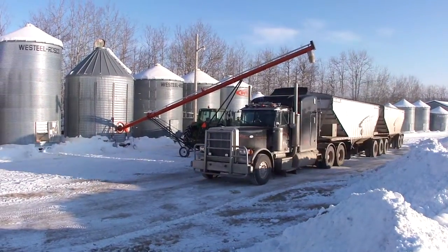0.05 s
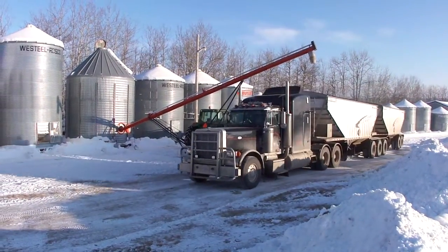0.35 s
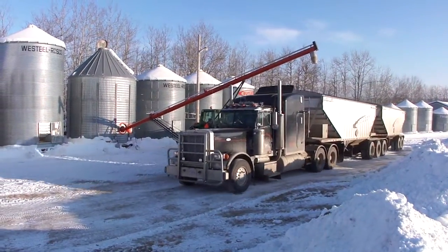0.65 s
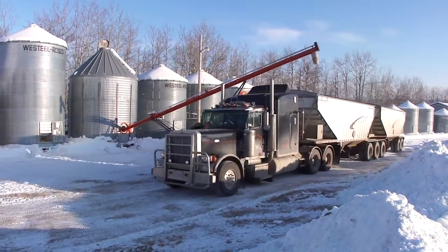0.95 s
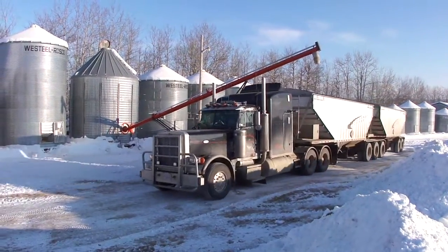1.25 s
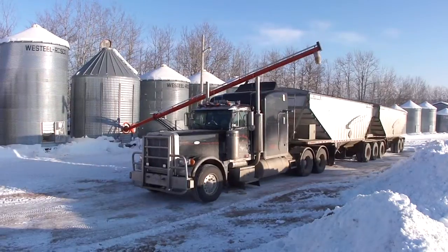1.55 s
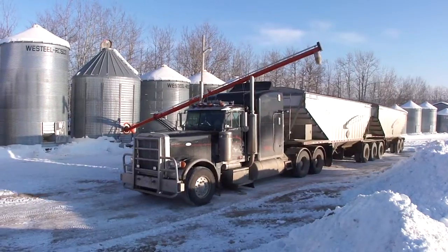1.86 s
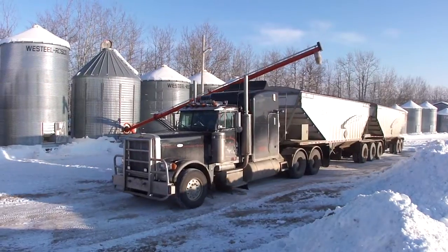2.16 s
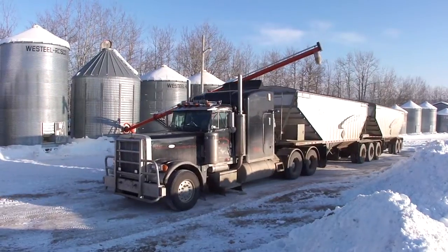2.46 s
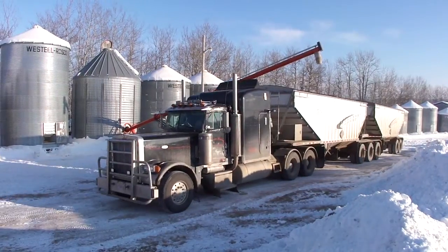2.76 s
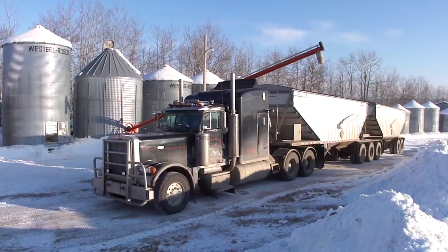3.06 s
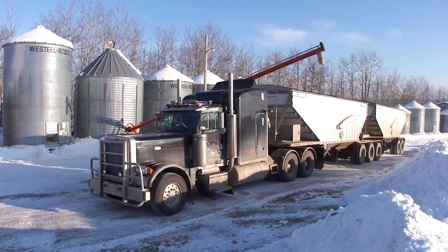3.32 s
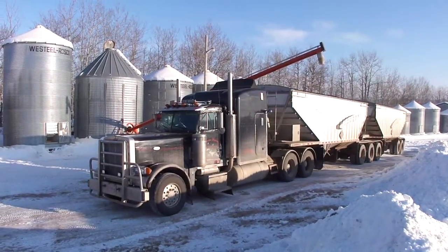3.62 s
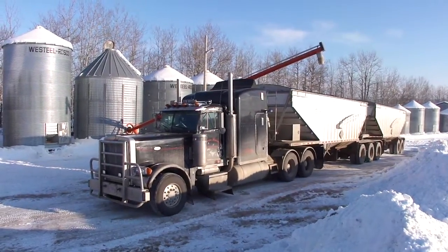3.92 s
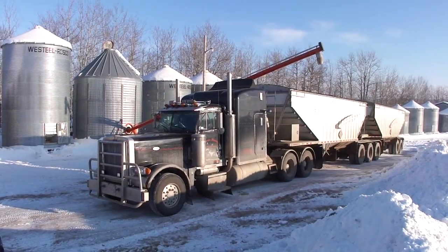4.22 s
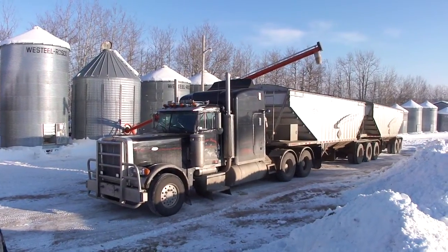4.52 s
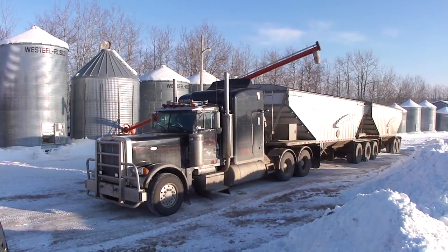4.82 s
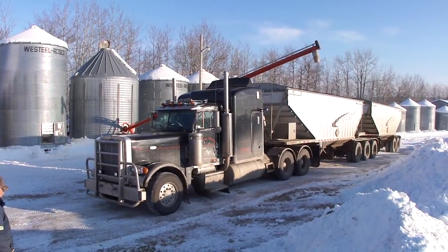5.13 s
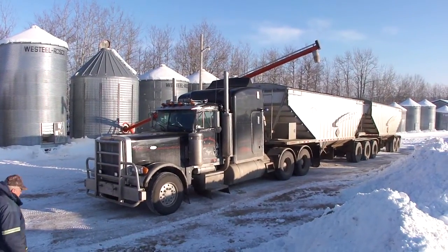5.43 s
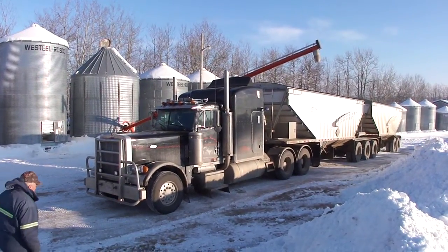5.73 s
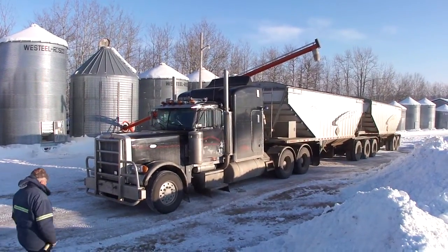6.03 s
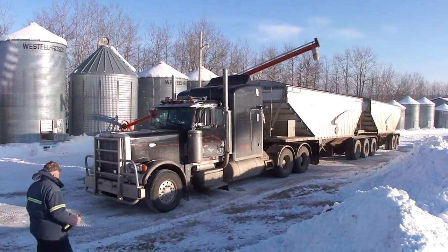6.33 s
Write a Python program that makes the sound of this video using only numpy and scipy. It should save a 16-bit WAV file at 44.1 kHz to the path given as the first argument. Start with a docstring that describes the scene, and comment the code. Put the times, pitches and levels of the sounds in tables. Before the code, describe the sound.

A heavy truck's diesel engine knocks and drones outdoors, with a few clicks, until a loud blast of air brake hiss bursts out and fades.

```python
"""A semi truck's air brakes let out a loud, fading hiss as compressed air rushes through their valves.
Before that, the truck rolls to a stop on a snowy farmyard, its tyres crunching on packed snow.
Its six-cylinder diesel idles throughout, knocking and droning as the cylinders fire in turn.
Steel grain bins echo a little, and automatic gain control turns everything down under the blast."""
import sys
import numpy as np
from scipy import signal
from scipy.fft import rfft, irfft, next_fast_len
from scipy.io import wavfile
from scipy.ndimage import uniform_filter1d, minimum_filter1d

SR = 44100
rng = np.random.default_rng(int(sys.argv[2]) if len(sys.argv) > 2 else 0)


def master_out(mix):
    """Clip the mix to full scale and print it as 16-bit PCM to the path in sys.argv[1]."""
    frames = np.transpose(np.atleast_2d(mix))
    ceiling = np.clip(frames, -1, 1)
    pcm = np.round(ceiling * 32767).astype(np.int16)
    wavfile.write(sys.argv[1], SR, pcm)


N = 281358
PADDED = next_fast_len(N + SR // 8, real=True)
T, HZ = np.arange(N) / SR, np.fft.rfftfreq(PADDED, 1 / SR)
TREBLE_LEFT_DB = 6.2  # hissy sounds are this much louder on the left


def gain_of(db):
    """Decibels to amplitude."""
    return 10 ** (np.asarray(db) / 20)

def evened(x):
    """Scales a sound to an average (rms) level of 1."""
    return x / np.sqrt(np.mean(x ** 2) + 1e-20)

def curve(points):
    """Joins (Hz, value) points into a value for every frequency."""
    hz, value = np.transpose(points)
    return np.interp(np.log(HZ + 1), np.log(hz + 1), value)

def filtered(x, gain):
    """Applies a gain for each frequency."""
    return irfft(rfft(x, PADDED) * gain, PADDED)[..., :N]

def coloured(x, spectrum, modes=()):
    """Gives a sound a broad tone colour and ringing peaks, at level 1."""
    lift_db = sum(db / (1 + (2 * (HZ - hz) / width) ** 2) for hz, width, db in modes)
    return evened(filtered(x, gain_of(curve(spectrum) + lift_db)))

def band(x, hz, width):
    """Keeps the part of a short sound near one frequency, at level 1."""
    f = np.fft.rfftfreq(x.shape[-1], 1 / SR) + 1
    return evened(irfft(rfft(x) / (1 + ((f - hz ** 2 / f) / width) ** 2), x.shape[-1]))

def wander(hz):
    """A random drift of size 1, up to the given rate."""
    return evened(np.interp(2 * hz * T, np.arange(4096), rng.standard_normal(4096)))

def tone(turns, db):
    """A pure tone with one wave per turn."""
    return gain_of(db) * np.sqrt(2) * np.sin(2 * np.pi * (turns + rng.random()))

def leftward(db):
    """Two channel gains that make the left louder by db."""
    return gain_of(np.array([[db], [-db]]) / 2)

def add(mix, start, sound):
    """Mixes a sound in at a start time in seconds."""
    part = mix[:, round(start * SR):][:, :sound.shape[-1]]
    part += sound[..., :part.shape[-1]]

# How alike left and right are. Each row: frequency in Hz, likeness from 0 to 1.
STEREO_LIKENESS = [(30, .6), (70, .85), (200, .98), (1200, .995), (2500, .985), (5500, .87), (11000, .83)]
def air():
    """Stereo white noise, most alike on both sides in the middle frequencies."""
    same = curve(STEREO_LIKENESS)
    mid, side = filtered(rng.standard_normal((2, N)), np.sqrt([(1 + same) / 2, (1 - same) / 2]))
    return np.array([mid + side, mid - side])

def road_speed(halt_s=3.2):
    """Share of the starting speed: the braking grows firmer until the halt."""
    return np.maximum(1 - (T / halt_s) ** 2, 0)

def nearness_db(start_m_per_s=2.85, parked_m=13.4):
    """The truck gets louder as it nears, reaching 0 dB where it stops."""
    rolled_m = np.cumsum(start_m_per_s * road_speed()) / SR
    return 20 * np.log10(parked_m / (parked_m + rolled_m[-1] - rolled_m))

def yard_echoes(x, fade_s=0.45, per_s=2000):
    """Sound bounces off the trailer and grain bins, differently on each side."""
    t = T[:SR // 2]
    echoes = rng.standard_normal((2, len(t))) * (rng.random((2, len(t))) < per_s / SR)
    echoes *= (t > .004) * gain_of(-60 * t / fade_s)
    echoes /= np.linalg.norm(echoes, axis=1, keepdims=True)
    return signal.fftconvolve(x, echoes, axes=1)[:, :N]

# Small clicks. Each row: start in seconds, level in dB, centre in Hz, width in Hz,
# seconds to fade by 60 dB.
CLICK_EVENTS = [(0.6166, -6, 1700, 1400, 0.012), (0.6164, -17, 3700, 3400, 0.015),
                (.6385, -31, 6500, 2500, .02), (.6555, -33, 6200, 5500, 0.023),
                (.7403, -27, 7300, 3500, 0.016), (.8311, -34, 5000, 3500, .03),
                (1.852, -32, 4700, 1500, 0.054), (1.881, -31, 7200, 2550, .025),
                (1.903, -32, 7000, 2500, .025), (1.976, -29, 7000, 3500, .02),
                (2.035, -33, 7000, 3500, .02), (2.544, -35, 7000, 3500, .025),
                (4.384, -25, 8600, 5000, 0.065), (5.572, -23, 6900, 1800, 0.036)]
def clicks(rise_s=.0008):
    """Valves, chassis and ice give sharp ticks that die at once."""
    out, t = np.zeros((2, N)), T[:SR // 2]
    for start, db, hz, width, fade_s in CLICK_EVENTS:
        snap = np.minimum(t / rise_s, 1) * gain_of(db - 60 * t / fade_s)
        add(out, start, snap * band(rng.standard_normal(len(t)), hz, width))
    return out * leftward(TREBLE_LEFT_DB)

# Spits of air. Each row: start and length in seconds, level in dB, centre and width in Hz, sputter in dB.
AIR_SPITS = [(0.634, 0.11, -36.5, 7300, 4500, 1), (0.657, 0.13, -33.5, 2700, 700, 5),
             (0.766, 0.14, -39, 6560, 3500, 3.5), (1.309, 0.045, -32, 5730, 700, 1),
             (1.316, 0.12, -33.5, 9300, 2500, -1), (4.388, .09, -43, 8000, 4000, 0)]
def spits(rise_s=0.0041, sputter_hz=164):
    """Small escapes of air swell quickly, sputter and fade."""
    out, noise, t = np.zeros((2, N)), air(), T[:SR // 2]
    for start, length, db, hz, width, sputter_db in AIR_SPITS:
        swell = (1 - np.exp(-t / rise_s)) * np.exp(-(t / length) ** 2)
        sputter = evened(gain_of(sputter_db * wander(sputter_hz)[:len(t)]))
        hiss = band(noise[:, round(start * SR):][:, :len(t)], hz, width)
        add(out, start, gain_of(db) * swell * sputter * hiss)
    return out * leftward(TREBLE_LEFT_DB)

# The tone colour of packed snow. Each row: frequency in Hz, relative level in dB.
SNOW_COLOUR = [(1000, -20), (2600, 12.5), (4500, 0.5), (6400, 4), (8000, 5), (10000, 1), (11500, -7)]
def tyres(cracks_per_s=900, hiss=0.17):
    """Snow cracks and hisses under the tyres, more quietly as they slow."""
    cracks = (rng.random(N) < cracks_per_s / SR) * gain_of(2 * np.minimum(rng.exponential(1, N), 4))
    crunch = coloured((cracks + hiss) * air(), SNOW_COLOUR)
    return gain_of(-39.5) * road_speed() ** 0.36 * crunch * leftward(TREBLE_LEFT_DB)

# The tone colour under the truck. Each row: frequency in Hz, relative level in dB.
UNDERSIDE_COLOUR = [(30, -85), (100, -46), (400, -17), (580, -1.5), (900, 4), (1200, -3), (1600, -10.5),
                    (3000, -32)]
def driveline(turns, teeth=48, clutch_s=1.23, fade_db_per_s=75):
    """Shafts rumble and gears whine until the clutch opens."""
    fade_db = fade_db_per_s * np.maximum(T - clutch_s, 0)
    rumble = gain_of(-40 - fade_db) * coloured(air(), UNDERSIDE_COLOUR)
    whine = tone(teeth * turns, -32 - fade_db + .3 * wander(hz=2.9))
    return (rumble + whine) * leftward(db=1)

def burst(start, rise, hold, sag_db_per_s, fade_db_per_s):
    """A loudness shape that rises, sags while it holds, then fades faster."""
    age = T - start
    fall_db = sag_db_per_s * np.maximum(age - rise, 0) + fade_db_per_s * np.maximum(age - rise - hold, 0)
    return np.clip(age / rise, 0, 1) * gain_of(-fall_db)

# Roars and clunks. Each row: start, rise and hold in seconds, level in dB, extra fade in dB a second.
ROARS_AND_CLUNKS = [(0.418, 0.26, 0.21, -24.5, 38), (1.125, 0.025, 0.023, -30, 200),
                    (4.489, 0.064, 0.015, -15, 400), (4.653, 0.025, 0.1, -24.5, 40),
                    (4.84, 0.022, 0.064, -16, 36), (5.16, 0.028, 0.023, -29, 112)]
def chassis(sag_db_per_s=7.5):
    """Low roars and clunks swell under the truck as it slows and as the air escapes."""
    swell = sum(gain_of(db) * burst(start, rise, hold, sag_db_per_s, fade)
                for start, rise, hold, db, fade in ROARS_AND_CLUNKS)
    return swell * coloured(air(), UNDERSIDE_COLOUR) * leftward(db=-0.1)

# The idle speed. Each row: time in seconds, turns a minute.
IDLE_SPEED = [(0, 704.3), (1.1, 704.6), (1.5, 701.6), (2.3, 700.8), (6.4, 700.5)]
def crank():
    """Counts the crankshaft's turns; the speed governor lets them waver slightly."""
    per_minute = np.interp(T, *np.transpose(IDLE_SPEED))
    return np.cumsum(per_minute) / SR / 60 + 0.00057 * wander(hz=4)

def blows(cycles, cylinder_db, delay, rise, decay, scatter_db=2.5):
    """Each cylinder strikes once a cycle; times are shares of the gap between firings."""
    number, age = np.divmod(cycles * len(cylinder_db) - delay, 1)
    number = number.astype(int)
    size_db = cylinder_db[number % len(cylinder_db)] + scatter_db * rng.standard_normal(256)[number]
    return gain_of(size_db) * (1 - np.exp(-age / rise)) * np.exp(-age / decay)

def rattle(cycles, repeat):
    """Noise from parts that strike partly alike in every engine cycle, partly at random."""
    pattern = rng.standard_normal(7560)
    repeating = pattern[(cycles % 1 * len(pattern)).astype(int)]
    return np.sqrt(repeat) * repeating + np.sqrt(1 - repeat) * air()

# The tone colour of fan and belts. Each row: frequency in Hz, relative level in dB.
FAN_COLOUR = [(1000, -33), (2500, -8.5), (4500, 3.5), (6400, 0.5), (8000, 1), (10000, 1), (11500, -55.5)]
def fan_and_belts(cycles, clack_db):
    """Fan and belts fizz faintly, pulsing with each firing."""
    puffs = .75 + blows(cycles, clack_db / 2, delay=.15, rise=.3, decay=.45)
    return gain_of(-43.5) * coloured(air() * puffs, FAN_COLOUR) * leftward(TREBLE_LEFT_DB)

# The drone's tones. Each entry: waves per crank turn, and in the second list its base level in dB.
DRONE_MULTIPLES = [6, 9, 11, 13, 15, 18, 23.5, 25, 31, 33, 60, 70.5, 80, 92, 136, 149, 160]
DRONE_DB = [-60, -66, -58.5, -61, -55, -52.5, -52.5, -53, -48.5, -53.5, -43, -41, -36.5, -43.5, -40.5, -38,
            -44]
def drone(turns, near_db):
    """Gears and pipes sing; higher tones waver more in pitch and level."""
    tones = sum(tone(k * (turns + .0022 * wander(hz=11)), db + .35 * np.sqrt(k) * wander(hz=5))
                for k, db in zip(DRONE_MULTIPLES, DRONE_DB))
    return tones * gain_of(near_db - near_db.mean()) * leftward(db=1.2)

# The tone colour of the exhaust. Each row: frequency in Hz, relative level in dB.
EXHAUST_COLOUR = [(20, -55), (40, -43), (90, -20), (125, -8.5), (190, -2), (240, -1), (300, -0.3),
                  (380, 0.5), (520, -1), (800, -1), (2000, -57)]
def exhaust(cycles, thump_db, near_db):
    """Each firing sends a thump of gas down the pipe."""
    thumps = blows(cycles, thump_db, delay=0.19, rise=0.15, decay=0.36, scatter_db=0.5)
    gas = rattle(cycles, repeat=0.55) * (0.94 + thumps)
    return gain_of(-34 + near_db) * coloured(gas, EXHAUST_COLOUR)

# The tone colour of the engine block. Each row: frequency in Hz, relative level in dB.
BLOCK_COLOUR = [(150, -54), (400, -17), (520, -1), (700, -1), (1020, -3.5), (1170, -3.5), (1340, -15),
                (1600, -7.5), (3000, -34.5)]
# Where the engine's metal rings. Each row: frequency in Hz, width in Hz, boost in dB.
METAL_RINGS = [(557, 30, 4), (876, 12, 7.5), (976, 91, 7), (1105, 35, 2), (1600, 52, -0.5), (1694, 12, 4.5),
               (2382, 40, 6.5)]
def block(cycles, knock_db, near_db):
    """Each firing knocks the engine block and makes it ring."""
    knocks = blows(cycles, knock_db, delay=.34, rise=.05, decay=.17)
    shaking = rattle(cycles, repeat=.42) * (.75 + knocks) * gain_of(.6 * wander(hz=12))
    return gain_of(-24 + 0.22 * near_db) * coloured(shaking, BLOCK_COLOUR, METAL_RINGS)

def lope(cycles, rolling_db=1.85, parked_db=2, peak_share=.74):
    """The clatter swells once a cycle, a little more once the brakes are set."""
    depth_db = np.where(T < BRAKE_VENTS[0][0], rolling_db, parked_db)
    return gain_of(depth_db * np.cos(2 * np.pi * (cycles - peak_share)))

def gear_snaps(per_s=90):
    """Loose gear teeth snap at random moments."""
    return evened((rng.random(N) < per_s / SR) * rng.choice([-1, 1], N))

# The tone colour of the cylinder head. Each row: frequency in Hz, relative level in dB.
HEAD_COLOUR = [(500, -40.5), (1100, -17), (1340, -6.5), (1550, 0.5), (1850, -1.5), (2150, -9),
               (2550, -18.5), (3000, -17.5), (4500, -28), (9000, -41)]
def head(cycles, clack_db, slap_db, near_db):
    """Fuel injectors clack and valves slap in the top of the engine."""
    clacks = blows(cycles, clack_db, delay=.19, rise=.1, decay=.19)
    slaps = blows(cycles, slap_db, delay=.63, rise=.1, decay=.19)
    clatter = evened(rattle(cycles, repeat=.35) * (.5 + clacks + slaps) * lope(cycles))
    clatter = clatter + .08 * gear_snaps()
    return gain_of(-25 + 0.24 * near_db) * coloured(clatter, HEAD_COLOUR, METAL_RINGS)

# The six cylinders in firing order. Each row: block knock, injector clack, valve slap and
# exhaust thump, all as relative levels in dB.
CYLINDER_BLOWS = [(-4, -3, 2, -22), (0, 1, 0, 5), (-10, 5.5, -5, 11), (3.5, -6, -1, 5), (-1.5, -5, -6, -24),
                  (-4.5, 3, -1.5, 10.5)]
def engine(turns):
    """A four-stroke diesel: every cylinder fires once in two turns of the crank."""
    cycles, near_db = turns / 2, nearness_db()
    knock_db, clack_db, slap_db, thump_db = np.transpose(CYLINDER_BLOWS)
    metal = block(cycles, knock_db, near_db) + head(cycles, clack_db, slap_db, near_db)
    return (metal * leftward(db=0.5) + exhaust(cycles, thump_db, near_db)
            + fan_and_belts(cycles, clack_db) + drone(turns, near_db))

# Whistles at full flow and as the pressure fades. Each row: start and length in seconds,
# pitch, dip and tremble in Hz, level in dB.
VALVE_WHISTLES = [(4.6, 0.032, 7980, 278, 36, -7.5), (4.635, 0.031, 8100, 96, 35, -10),
                  (5.048, 0.49, 6385, 9.7, 110, -38)]
def whistle(start, length, hz, dip_hz, tremble_hz, db):
    """Air whistles over a valve's lip; the pitch trembles, and dips as the sound swells."""
    arch = np.sin(np.pi * np.clip((T - start) / length, 0, 1))
    pitch = hz - dip_hz * arch + tremble_hz * wander(hz=246.5)
    return arch * tone(np.cumsum(pitch) / SR, db) * leftward(TREBLE_LEFT_DB)

# The tone colours of the thin jet and the hollow rush. Each row: frequency in Hz, relative level in dB.
JET_COLOUR = [(1000, -50), (3000, -27), (5000, -10.5), (6400, -3.5), (7800, -0.5), (9000, 0), (10000, -0.5),
              (11500, -4.5)]
RUSH_COLOUR = [(300, -31), (900, 2.5), (1400, 5), (1900, 7), (2400, 3), (3200, 3), (5000, -0.5), (9000, -9)]
# Where the valve body rings. Each row: frequency in Hz, width in Hz, boost in dB.
VALVE_RINGS = [(1240, 49, 3), (1900, 320, 2.6), (2354, 66, 11.4), (2780, 110, 4), (6460, 110, 3),
               (7250, 110, 2.6), (7940, 70, 3), (7730, 78, 4.2), (8700, 66, 1.8)]
# Valves letting air out. Each row: start, rise and time held open in seconds, jet and rush levels in dB,
# sag in dB a second (below zero it grows), extra fade once shut in dB a second.
BRAKE_VENTS = [(4.451, 0.028, 0.865, -15, -20.5, 16, 42), (4.488, 0.085, 0.3, -13, -11.5, 6.5, 33.5),
               (4.574, 0.006, 0.14, -8, -25.5, -7, 258)]
def air_brakes():
    """Compressed air dumps through the valves: a fluttering jet over a hollow rush."""
    flows = np.array([burst(start, rise, hold, sag, fade)
                      for start, rise, hold, _, _, sag, fade in BRAKE_VENTS])
    jet_db, rush_db = np.transpose(BRAKE_VENTS)[3:5]
    # the valves' noises add up by power
    jet = np.sqrt(gain_of(jet_db) ** 2 @ flows ** 2) * coloured(air(), JET_COLOUR, VALVE_RINGS)
    rush = np.sqrt(gain_of(rush_db) ** 2 @ flows ** 2) * coloured(air(), RUSH_COLOUR, VALVE_RINGS)
    flutter = gain_of(0.9 * wander(hz=71.4))
    return flutter * (jet * leftward(TREBLE_LEFT_DB) + rush * leftward(db=0.5))

def scene():
    """The truck and its echoes."""
    turns = crank()
    truck = clicks() + spits() + tyres() + driveline(turns) + chassis() + engine(turns)
    truck += sum(whistle(*row) for row in VALVE_WHISTLES) + air_brakes()
    return truck + gain_of(-18.5) * yard_echoes(truck)

# The microphone's tone colour. Each row: frequency in Hz, gain in dB.
MIC_COLOUR = [(1000, 1.5), (2300, 2.5), (2600, 7.5), (2800, -3), (3250, 4), (3600, -2.5), (4700, 0.5),
              (5040, -0.5), (5350, 2), (6400, 1.5), (10300, -6.5), (11000, -10.5), (11600, -22.5)]
# Gaps in what the microphone hears. Each entry: centre in Hz.
MIC_NOTCHES = [3005, 4010, 5035]
def record(dry, threshold_db=-12.0, hold_s=0.22, recovery_db_per_s=17, notch_width_hz=1400, top_hz=11650):
    """The microphone colours the sound; gain control turns loud moments down, holds, then recovers."""
    notches = np.prod([abs(HZ - hz) / np.hypot(HZ - hz, notch_width_hz / 2) for hz in MIC_NOTCHES], axis=0)
    x = filtered(dry, gain_of(curve(MIC_COLOUR)) * notches)
    power_db = 10 * np.log10(abs(uniform_filter1d((x ** 2).mean(0), size=900)) + 1e-12)
    hold = round(hold_s * SR)
    held_db = -minimum_filter1d(-power_db, hold, origin=(hold - 1) // 2)
    recovery_db = T * recovery_db_per_s
    tracked_db = np.maximum.accumulate(held_db + recovery_db) - recovery_db
    cut_db = np.maximum(tracked_db - threshold_db, 0)
    x = x / gain_of(uniform_filter1d(cut_db, size=200))
    x = x / (1 + (x / .88) ** 8) ** (1 / 8)  # rounds off the tallest peaks
    low_pass = signal.firwin(511, top_hz, window=("kaiser", 9), fs=SR)
    return signal.oaconvolve(x, low_pass[None], "same")


dry = scene()
out = record(dry)
master_out(out)
```